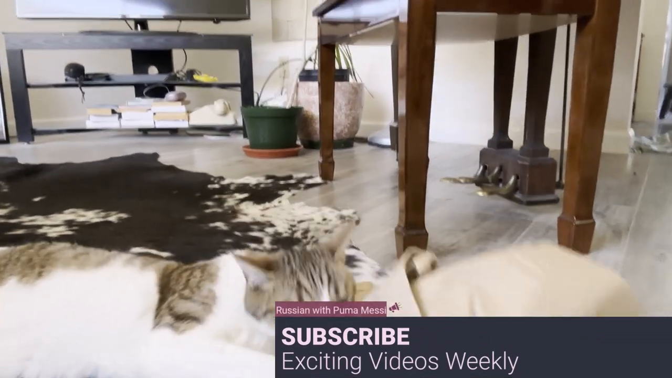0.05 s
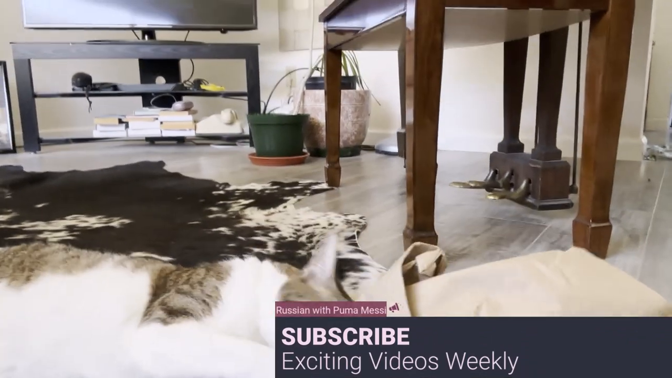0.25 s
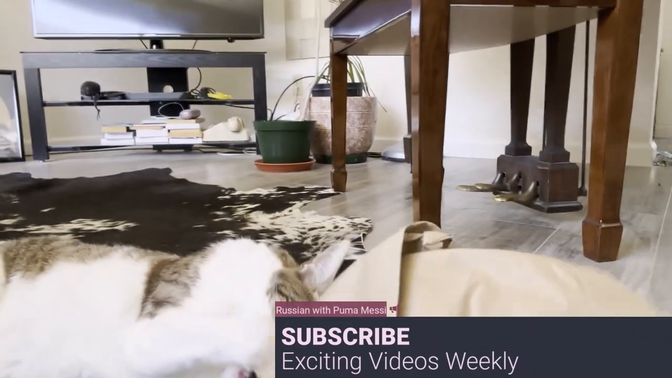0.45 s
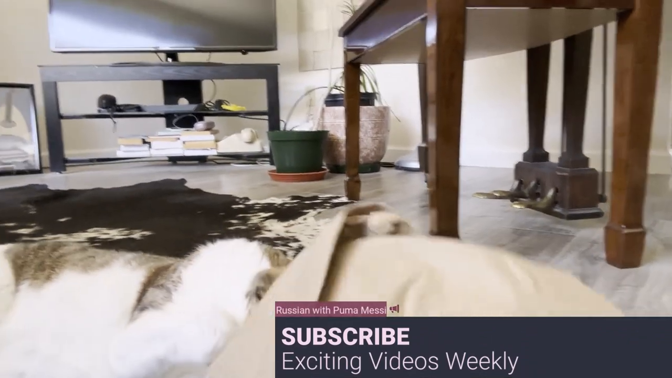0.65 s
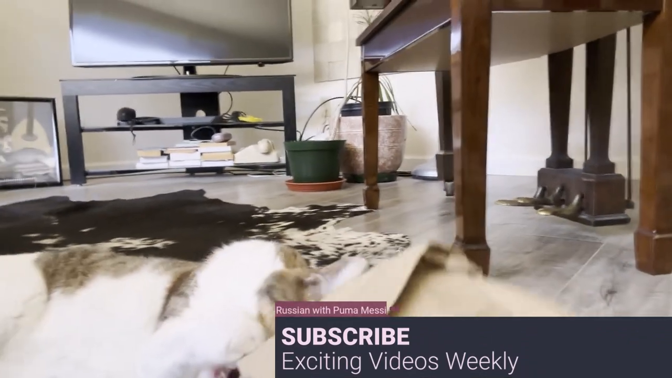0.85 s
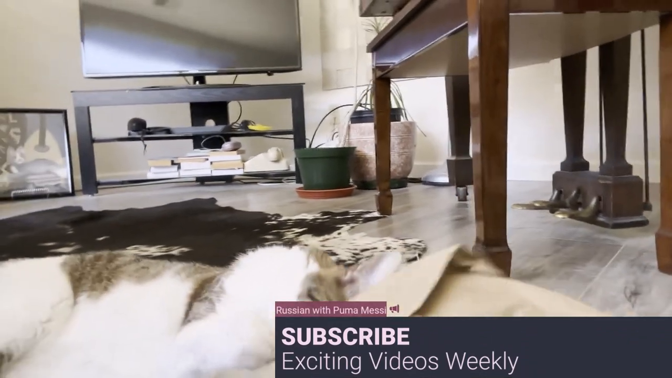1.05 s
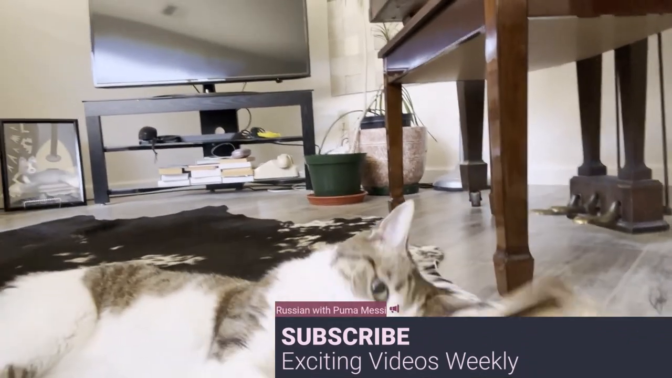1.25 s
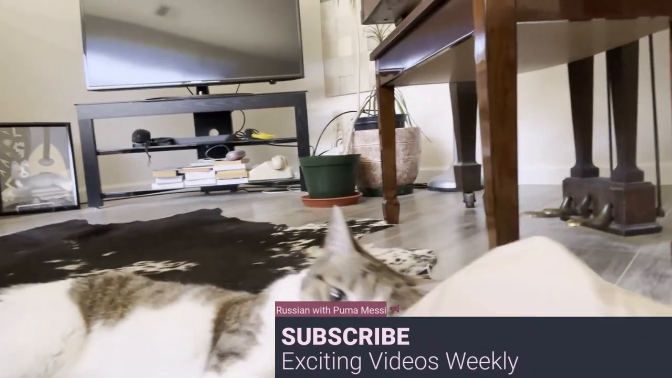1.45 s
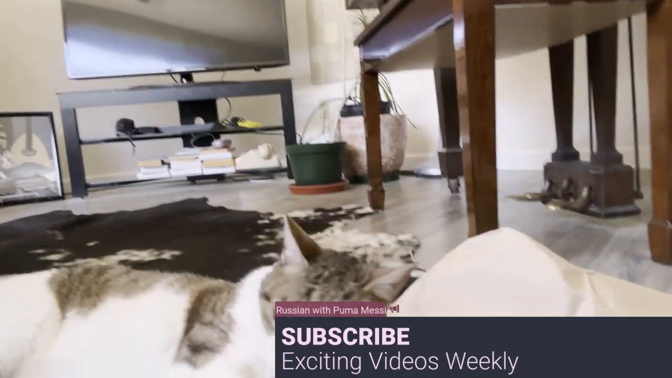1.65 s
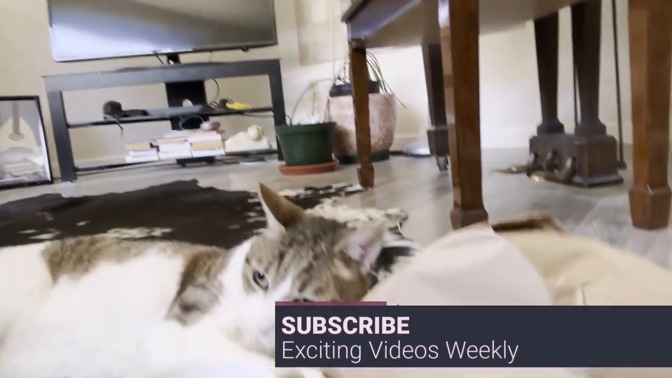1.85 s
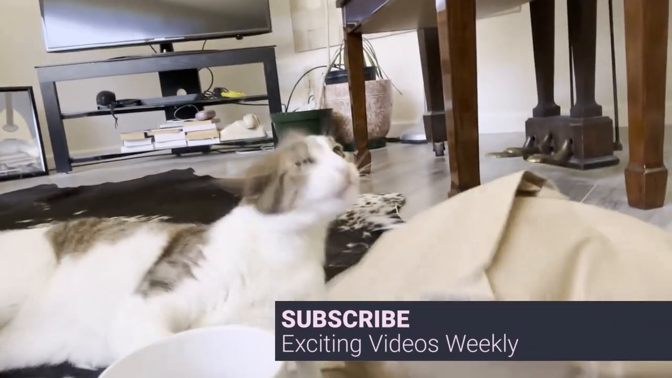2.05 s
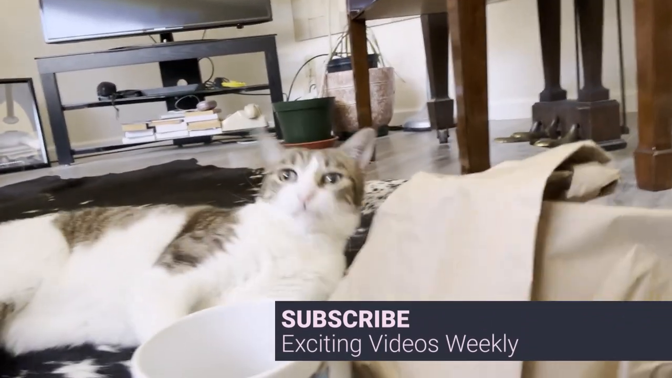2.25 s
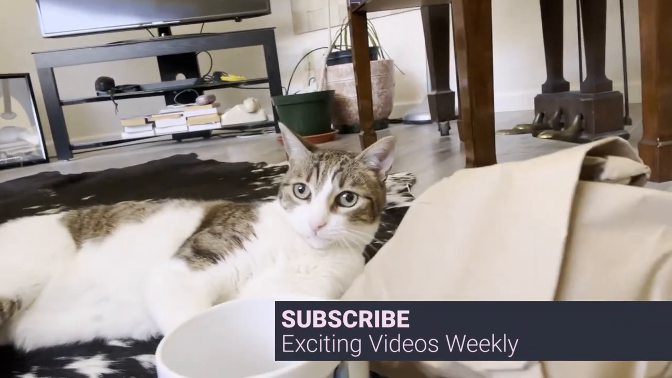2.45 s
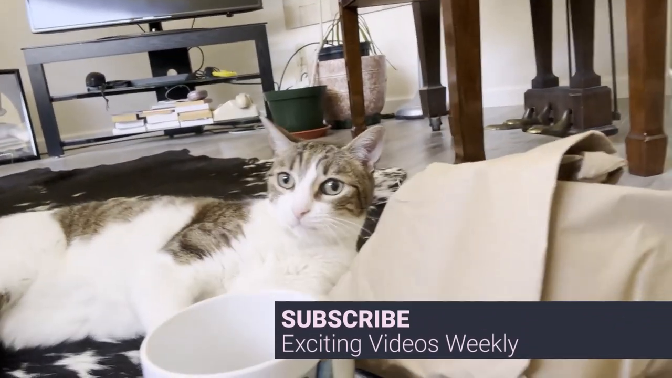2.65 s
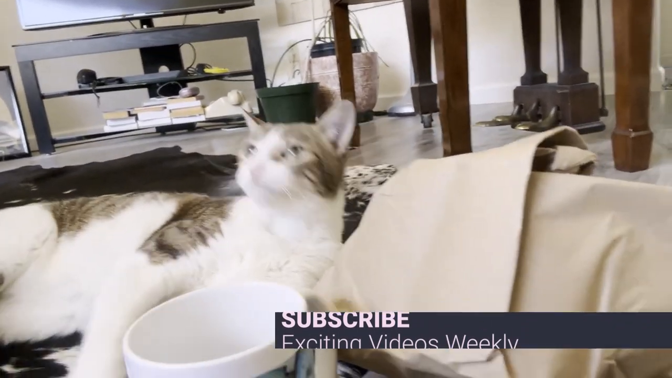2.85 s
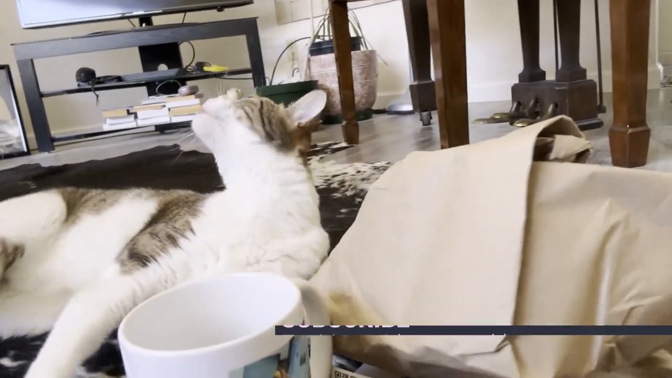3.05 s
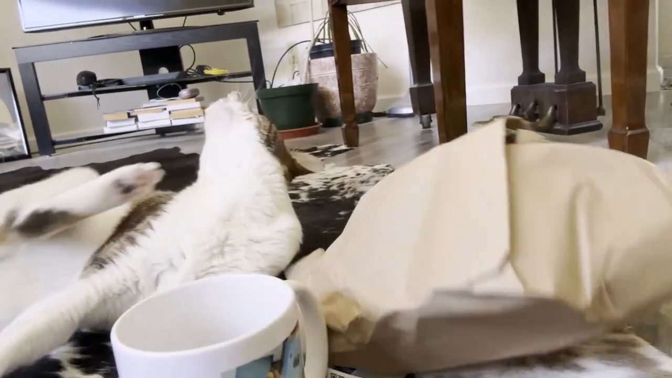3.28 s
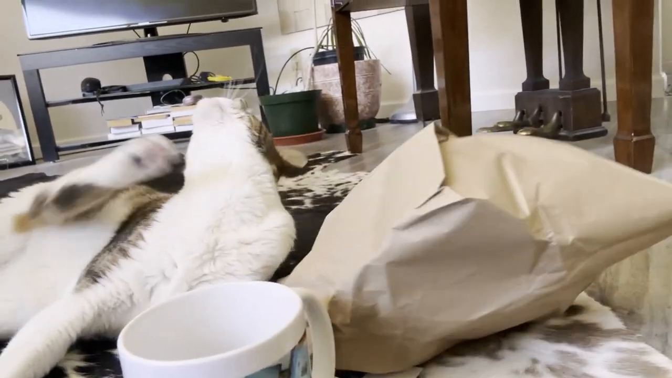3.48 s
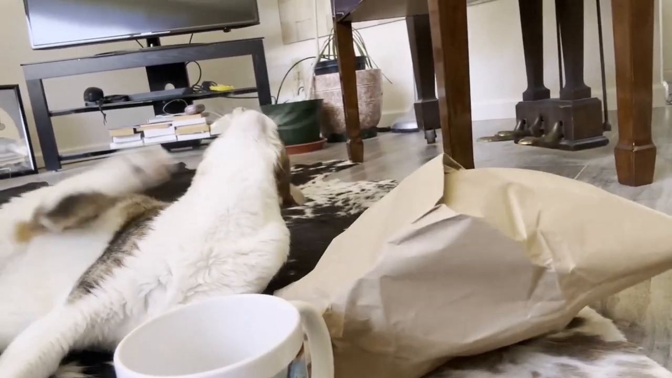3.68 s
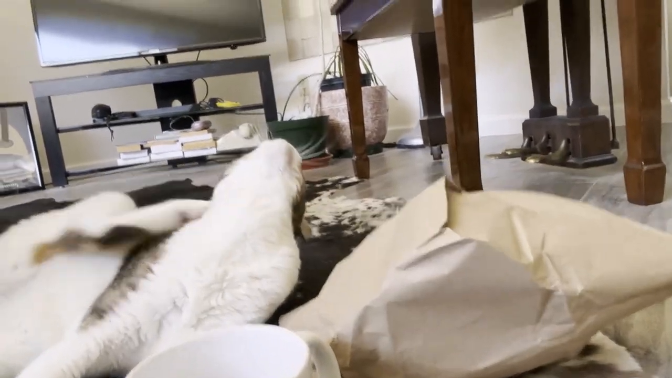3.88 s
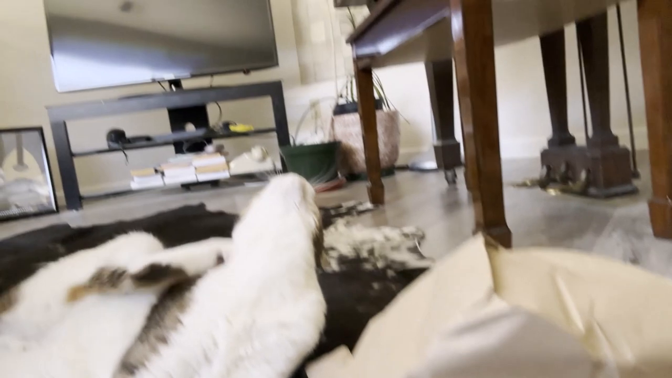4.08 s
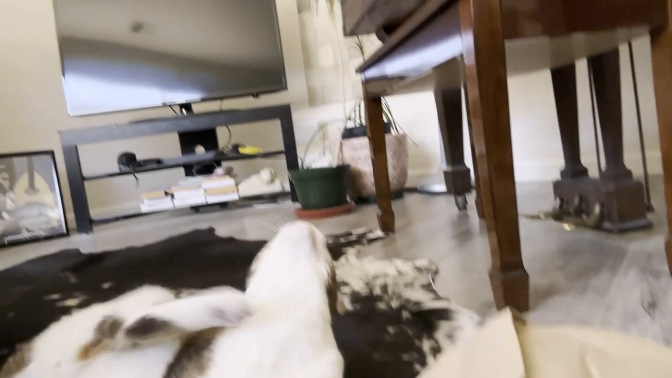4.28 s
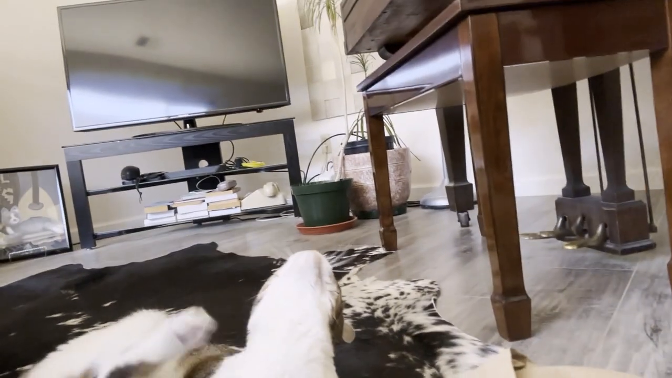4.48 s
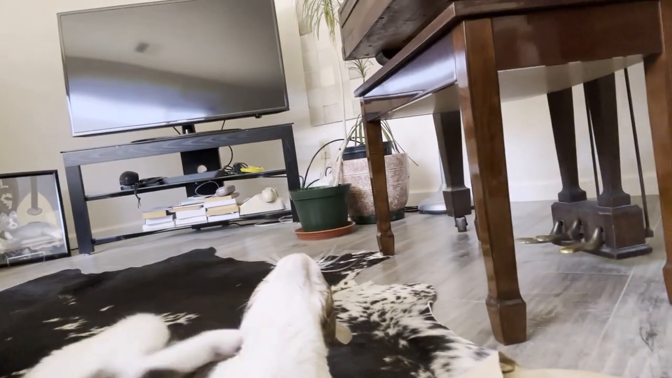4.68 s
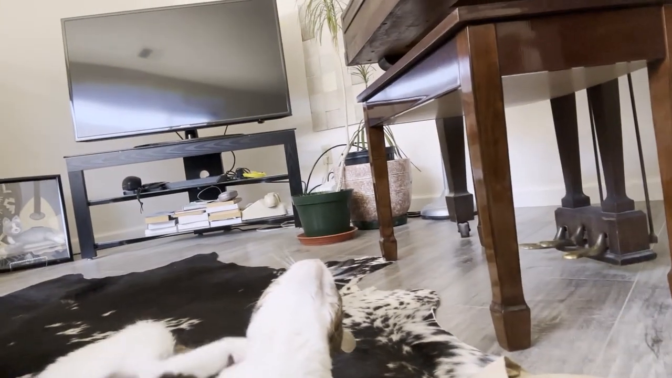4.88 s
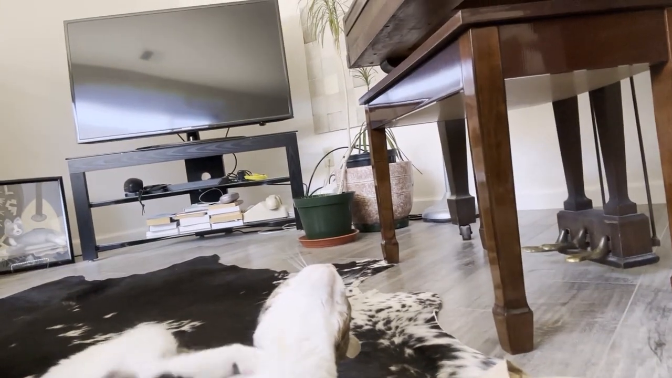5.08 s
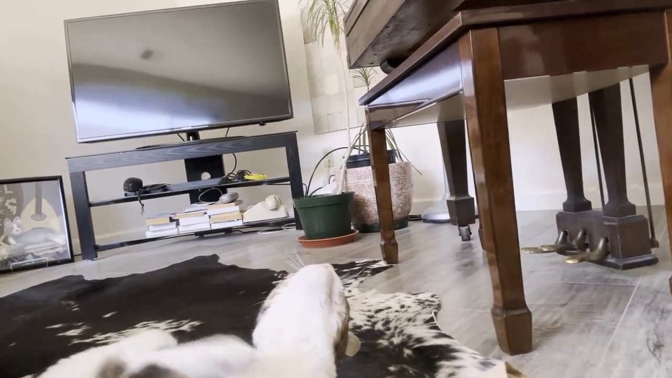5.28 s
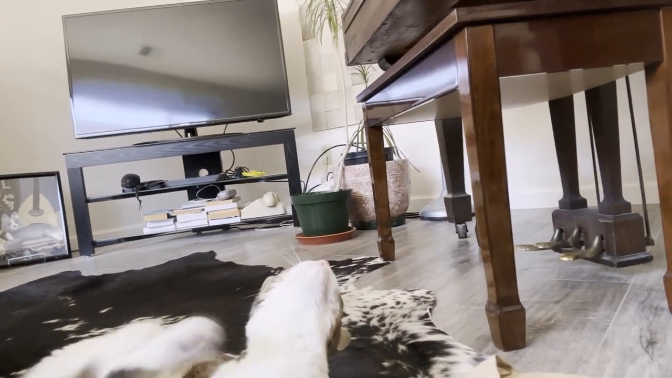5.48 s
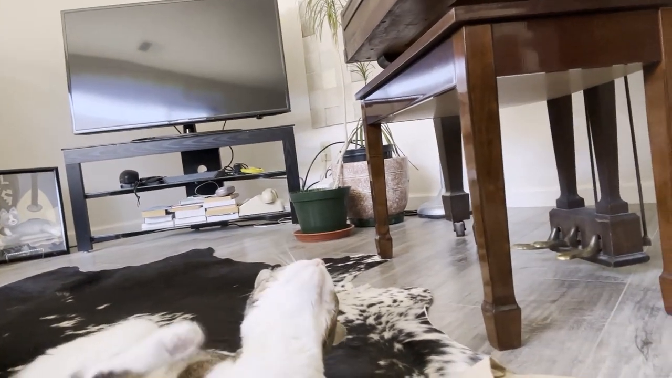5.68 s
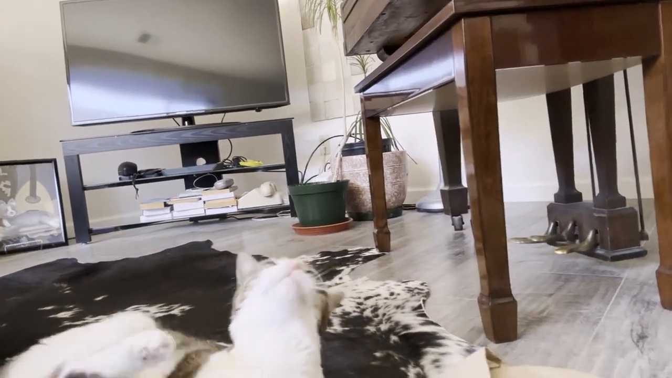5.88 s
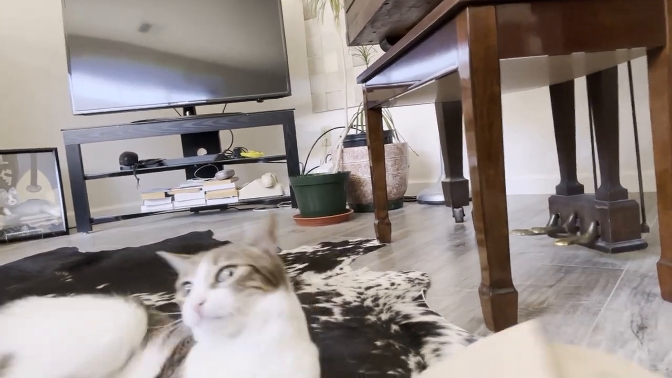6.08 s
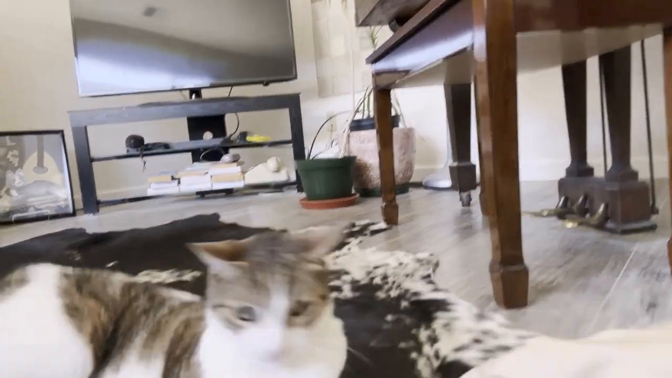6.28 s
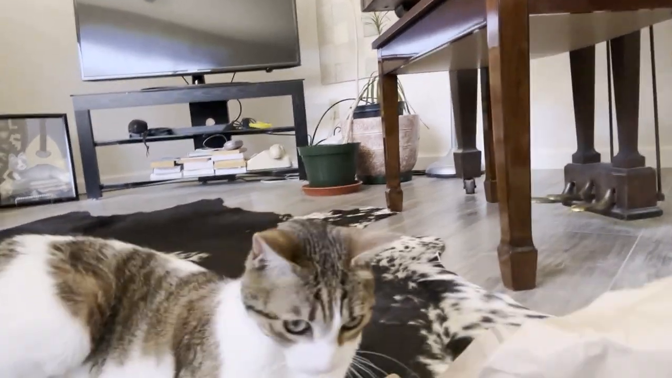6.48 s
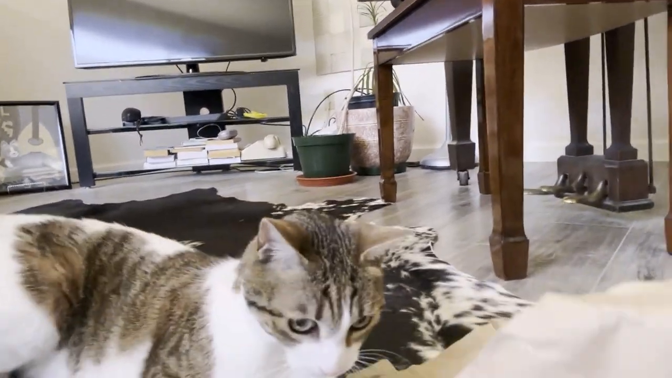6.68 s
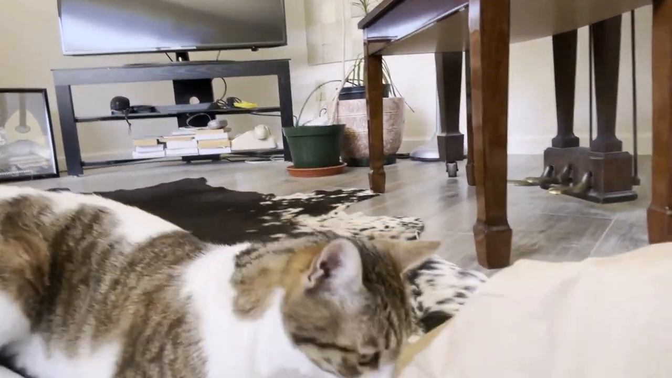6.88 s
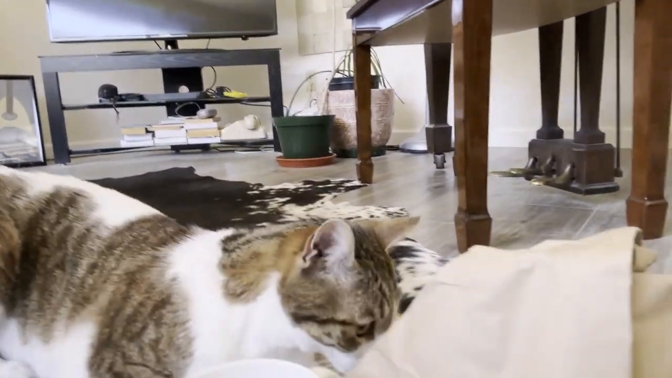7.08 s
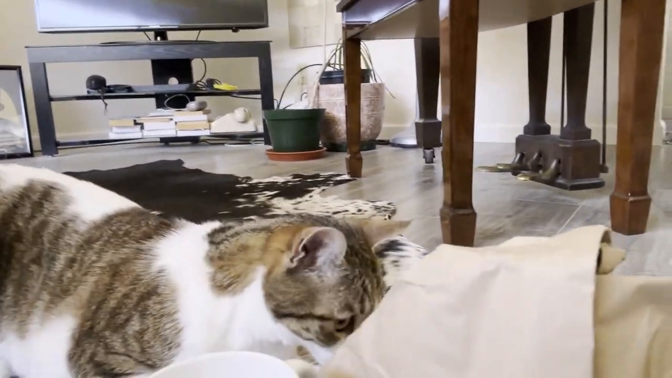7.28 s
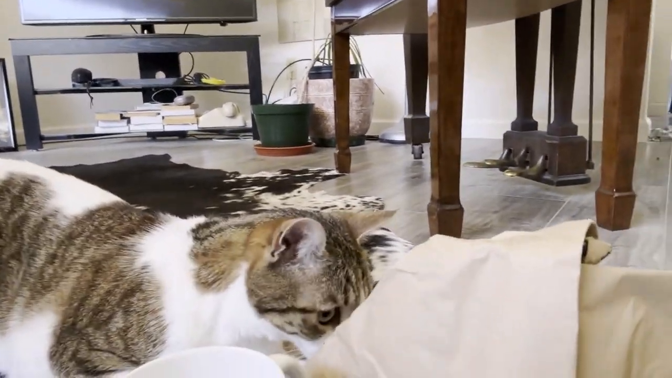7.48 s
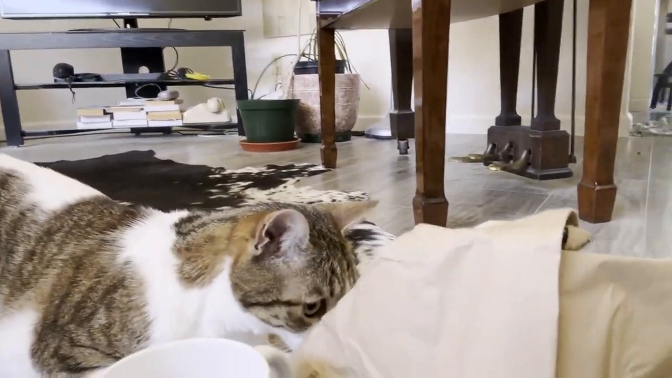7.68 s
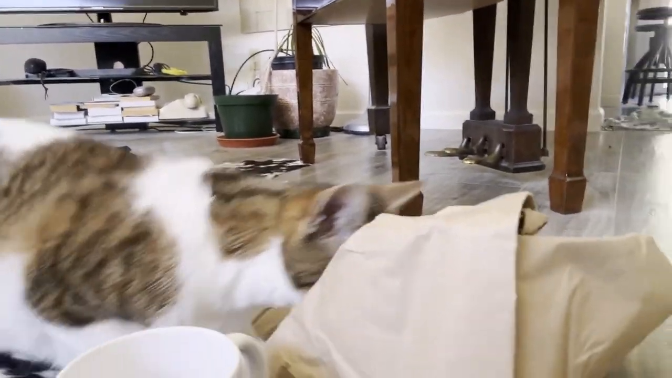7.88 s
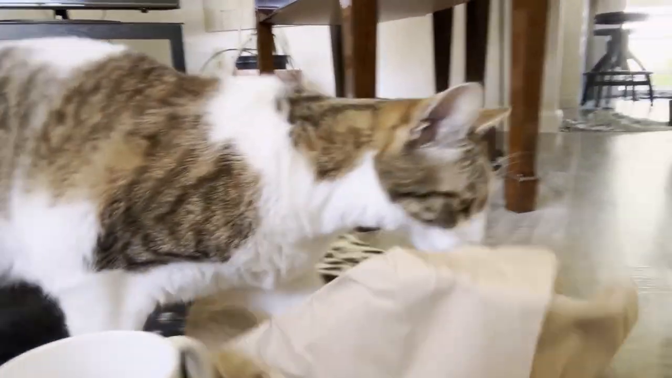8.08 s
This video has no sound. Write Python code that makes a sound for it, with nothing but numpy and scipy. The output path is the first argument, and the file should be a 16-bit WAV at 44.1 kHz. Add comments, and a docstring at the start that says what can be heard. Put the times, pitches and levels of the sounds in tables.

```python
"""On a living-room floor, a cat rolls on and pushes into brown packing paper, close to a hand-held phone.
Creases snap as short bursts, ripples and falling knocks, over a rustle of noise mixed with tiny buckles.
Low noise makes the sheet heave; an edge scrapes, soft brushing strokes fade, and a china mug rings once.
A furnished room answers with a fading tail of noise; left and right differ, but hardly in the top treble."""
import sys
import numpy as np
from scipy import signal
from scipy.fft import rfft, irfft, next_fast_len
from scipy.io import wavfile
from scipy.ndimage import uniform_filter1d, map_coordinates

SR = 44100
rng = np.random.default_rng(int(sys.argv[2]) if len(sys.argv) > 2 else 0)


def to_wav(s):
    """Save 16-bit WAV."""
    ch = np.atleast_2d(s).T  # columns
    pcm = np.round(np.clip(ch, -1, 1) * 32767)  # PCM
    wavfile.write(sys.argv[1], SR, pcm.astype(np.int16))


N = 358577  # length in samples


def amp(db):
    """Turn decibels into a plain multiplier."""
    return 10 ** (np.asarray(db) / 20)


def unit(x):
    """Scale a signal to an average strength (rms) of 1."""
    return x / np.sqrt(np.mean(x ** 2) + 1e-20)


def peak_one(x):
    """Scale a signal so that its highest peak is 1."""
    return x / np.abs(x).max()


def along(points, hz):
    """Read a curve of (f/Hz, value) points, spaced by pitch as the ear does."""
    f, value = np.transpose(points)
    return np.interp(np.log(hz + 1), np.log(f + 1), value)


def filtered(x, response):
    """Change the strength and timing of each frequency in x by a complex response."""
    size = next_fast_len(N + SR // 4)
    hz = np.fft.rfftfreq(size, 1 / SR)
    return irfft(rfft(x, size) * response(hz), size)[..., :N]


def wobble(rate):
    """A smooth random curve through a set number of random points per second."""
    knots = rng.standard_normal(int(N * rate / SR) + 4)
    return map_coordinates(knots, [np.arange(N) * rate / SR])


# Shared part of left and right; the top treble is the same in both: f/Hz, shared part [0 to 1]
SHARED_PART = [(50, 0.88), (300, 0.79), (1500, 0.5), (5000, 0.45), (10000, 0.76), (13000, 1)]


def paired(pair, spectrum):
    """Colour two unrelated signals and mix them into a left and right that share a set part."""
    def turn(hz):
        return np.arccos(np.clip(along(SHARED_PART, hz), 0, 1)) / 2

    def response(hz):
        return amp(along(spectrum, hz)) * [np.cos(turn(hz)), np.sin(turn(hz))]

    mid, side = filtered(pair, response)
    return np.array([mid + side, mid - side])


def rush(spectrum):
    """Coloured stereo noise with an rms of 1."""
    return unit(paired(rng.standard_normal((2, N)), spectrum))


# Colour of the quiet room air: f/Hz, relative level/dB per Hz
AIR_COLOUR = [(20, -25), (35, -3), (85, -2), (160, -17), (400, -18.5), (1200, -36.5), (4000, -37.5),
              (9000, -52), (13000, -40.5), (16000, -45.5)]
AIR_DB = -65.5


def air():
    """The quiet air of the room is a steady, mostly low noise."""
    return amp(AIR_DB) * rush(AIR_COLOUR)


# How long the room rings: f/Hz, time to fall by 60 dB [s]
ROOM_DECAY = [(150, 0.62), (1500, 0.53), (6000, 0.53), (15000, 0.45)]


def room(x):
    """The room's answer is a tail of noise in which each frequency dies at its own speed."""
    hz, t, z = signal.stft(rng.standard_normal((2, SR // 2)), SR, nperseg=256)
    fade = amp(-60 * t / along(ROOM_DECAY, hz)[:, None])
    tail = signal.istft(z * fade, SR, nperseg=256)[1]
    tail = tail / np.linalg.norm(tail[0])
    late = np.pad(x.mean(axis=0), (180, 0))  # the answer starts 180 samples late
    wet = signal.fftconvolve(late[None], tail, axes=1)
    return paired(wet[:, :N], [(100, -3), (15000, -2.0)])


# Taps on the mug: t/s, level/dB before a fixed trim
MUG_TAPS = [(6.3268, -16.5)]
# The ringing tones of the china: f/Hz, level/dB, time to fall by 60 dB [s]
CHINA_TONES = [(2261, -20, .3), (2449, -18, .52), (4800, -24, .06), (5938, -4, .18), (7300, -24, .08),
               (8877, -10, .13), (9039, -13, .14), (10210, -14, .16), (12020, -19, .12), (14630, -9, .13),
               (14860, -1, .06)]


def mug():
    """A light tap, a short bright noise, sets the china ringing in fading pure tones."""
    out = np.zeros(N + SR)
    t = np.arange(SR // 2) / SR
    for s, db in MUG_TAPS:
        ring = np.zeros(len(t))
        for hz, level, t60 in CHINA_TONES:
            ring += amp(level - 60 * t / t60) * np.sin(2 * np.pi * (hz * t + rng.random()))
        tap = 0.37 * amp(-60 * t / 0.049) * np.diff(rng.standard_normal(len(t) + 1))
        out[round(s * SR):][:len(t)] += amp(db - 9) * (ring + tap)
    return out[:N] * np.ones((2, 1))


# Colour of a brushing stroke: f/Hz, relative level/dB per Hz
BRUSH_COLOUR = [(150, 1), (400, 9.5), (1500, -3), (4000, 0.5), (8000, -11), (13000, -6), (16000, -8.5)]
STROKE_COUNT = 14
FIRST_STROKE_S, STROKE_GAP_S, GAP_GROWS_S = 3.755, .152, .0018
# the first stroke, the loss with each further one, the random scatter
STROKE_DB, STROKE_FADE_DB, STROKE_SCATTER_DB = -64.5, .75, 1.5


def strokes():
    """Soft brushing on the sheet slows and fades: each stroke is a flickering swell of noise, 1/8 s long."""
    t = np.arange(N) / SR
    swell = np.zeros(N)
    for k in range(STROKE_COUNT):
        middle = FIRST_STROKE_S + STROKE_GAP_S * k + GAP_GROWS_S * k * k / 2
        db = STROKE_DB - STROKE_FADE_DB * k + STROKE_SCATTER_DB * rng.standard_normal()
        swell += amp(db) * np.cos(np.pi * np.clip((t - middle) * 8, -.5, .5))
    return swell * amp(4.2 * wobble(56)) * rush(BRUSH_COLOUR)


# Loudness of a hollow scrape: t/s, level/dB
SCRAPE_LEVEL = [(2.841, -99), (2.92, -67.5), (3.04, -73), (3.09, -59), (3.2, -53.5), (3.3, -99)]


def scrape():
    """An edge drags over the floor and a fold of the paper colours the noise it makes."""
    s, db = np.transpose(SCRAPE_LEVEL)
    level = amp(np.interp(np.arange(N) / SR, s, db))
    return level * rush([(900, -26.5), (1150, 1.0), (1450, -2.5), (1800, -30.5)])


# Pushes of the cat: t/s at full strength, hold [s], rustle level/dB, hiss level/dB, heave level/dB
CAT_PUSHES = [(0.047, 0.013, -38, -38.5, -32), (0.149, 0.096, -50, -47, -50),
              (0.293, 0.026, -43.5, -37.5, -46), (0.373, 0.031, -32, -34.5, -36),
              (0.449, 0.068, -43.5, -43.5, -39), (0.555, 0.053, -32.5, -37.5, -37.5),
              (0.655, 0.051, -32.5, -39.5, -34.5), (0.796, 0.041, -37.5, -43, -44),
              (0.93, 0.018, -39.5, -44.5, -41), (1.007, 0.025, -27.5, -34.5, -33.5),
              (1.125, 0.013, -22.5, -31.5, -23.5), (1.212, 0.011, -29, -32, -34),
              (1.271, 0.022, -28, -34, -32), (1.378, .02, -23.5, -32, -26.5),
              (1.495, 0.018, -34.5, -38.5, -42), (1.592, 0.12, -44, -51, -52),
              (1.792, 0.012, -41.5, -48, -45.5), (1.875, 0.037, -50.5, -55, -58),
              (2.026, 0.014, -47, -50.5, -49), (2.089, 0.0084, -49.5, -66.5, -54),
              (2.164, 0.011, -49.5, -53, -39), (2.227, 0.014, -70, -59.5, -56),
              (2.381, 0.048, -71, -67, -74), (2.457, 0.018, -71, -72, -54),
              (2.626, 0.011, -59.5, -69.5, -59), (2.914, 0.15, -70, -61.5, -69),
              (3.079, 0.012, -50, -50, -55.5), (3.172, 0.3, -52.5, -53.5, -54.5),
              (3.54, 0.057, -56.5, -57.5, -50), (3.738, 0.0082, -61.5, -80, -53.5),
              (4.005, 0.083, -81, -78.5, -63.5), (4.173, 0.054, -67, -78.5, -59),
              (4.307, 0.033, -67.5, -73, -57.5), (4.458, 0.096, -70.5, -69, -69),
              (4.657, .01, -60, -59.5, -56), (5.1, 0.25, -77.5, -82, -73), (5.58, 0.018, -76.5, -88, -62),
              (5.865, 0.075, -72.5, -67.5, -73), (5.999, 0.13, -52.5, -54, -54),
              (6.18, 0.0054, -34.5, -36.5, -32), (6.271, 0.053, -53, -57, -53),
              (6.426, 0.013, -51, -59, -75), (6.55, 0.11, -73, -68, -81),
              (6.67, 0.012, -59.5, -64.5, -59.5), (6.784, 0.022, -61.5, -62.5, -57),
              (7.026, 0.079, -61, -57, -58), (7.699, 0.0052, -55.5, -59, -54),
              (7.847, 0.06, -46.5, -48, -56), (7.92, 0.0083, -65, -52, -45),
              (8.022, 0.091, -44, -47, -41.5)]
# The sheet barely stirring: rustle level/dB, hiss level/dB, heave level/dB
REST_LEVELS = (-79.5, -82, -72)
# slopes close to full strength, for rustle, hiss and heave
RISE_DB_PER_S, FALL_DB_PER_S = (318.5, 300, 260), (240, 219, 200.5)
BEND_S = 0.2  # slopes steepen further away: at this distance the loss has doubled


def motion():
    """Levels in dB of rustle, hiss and heave: pushes swell, hold and die away; overlapping ones add."""
    t = np.arange(0, N / SR, .004)
    power = amp(REST_LEVELS)[:, None] ** 2
    for s, hold_s, *dbs in CAT_PUSHES:
        before = np.maximum(s - t, 0)
        after = np.maximum(t - s - abs(hold_s), 0)
        rise_loss = np.outer(RISE_DB_PER_S, before * (1 + before / BEND_S))
        fall_loss = np.outer(FALL_DB_PER_S, after * (1 + after / BEND_S))
        power = power + amp(np.c_[dbs] - (rise_loss + fall_loss)) ** 2
    return [np.interp(np.arange(N) / SR, t, 10 * np.log10(p)) for p in power]


def grains(per_second, hz, cycles, spread_db):
    """Tiny buckles of the sheet at random times: short fading ripples, few large and many small, rms 1."""
    draw = rng.random((int(per_second * N / SR), 4))
    t = np.arange(200) / SR
    pitch = hz * np.exp(1.24 * (draw[:, 1:2] - .5))
    size = amp(-spread_db * np.log(draw[:, 2:3] + 0.0045)) * np.sqrt(pitch)
    fade = np.exp(-t * pitch / cycles)
    ripple = size * fade * np.sin(2 * np.pi * (pitch * t + draw[:, 3:]))
    at = (draw[:, :1] * N).astype(int) + np.arange(len(t))
    return unit(np.bincount(at.ravel(), ripple.ravel(), minlength=N)[:N])


def crackling(spectrum, crackle, share):
    """Smooth sliding noise gives way to crackle by a share of its power."""
    share = np.clip(share, 0, 1)
    two_crackles = np.array([crackle, np.roll(crackle, N // 2)])  # shifted in time to be unrelated
    grit = unit(paired(two_crackles, spectrum))
    return np.sqrt(1 - share) * rush(spectrum) + np.sqrt(share) * grit


# Colours of the middle rustle, the fine hiss and the low heave: f/Hz, relative level/dB per Hz
RUSTLE_COLOUR = [(120, -30.5), (250, 1.5), (500, -3), (1000, -3), (2000, -7.5), (3500, -18.5),
                 (8000, -46.5)]
HISS_COLOUR = [(1200, -27.5), (2500, -1.5), (4000, -1), (6000, 0), (8000, -7), (10500, -5), (13000, -1),
               (16000, -10)]
HEAVE_COLOUR = [(20, -33.5), (45, -10), (80, 1.5), (130, 0.5), (220, -9.5), (500, -45.5)]


def rustle():
    """Fur and paper slide and buckle: a middle rustle, a fine hiss and the low heave of the whole sheet."""
    rustle_db, hiss_db, heave_db = motion()
    # gentle moves mostly slide, strong ones buckle the sheet
    force = np.clip((rustle_db + 63.5) / 28, 0, 1)
    clumps = force * wobble(70)  # buckles come in clumps that both layers share
    body_grains = grains(300, hz=761, cycles=3.0, spread_db=4.0)
    fine_grains = grains(500, hz=4480, cycles=2.3, spread_db=2.5)
    body = crackling(RUSTLE_COLOUR, body_grains, share=0.3 + 0.35 * force)
    fine = crackling(HISS_COLOUR, fine_grains, share=0.32 + 0.29 * force)
    body = amp(rustle_db + 2 * clumps + 2 * wobble(25)) * body
    fine = amp(hiss_db + 3 * clumps + 1.5 * wobble(25)) * fine
    heave = amp(heave_db + 1.8 * wobble(14)) * rush(HEAVE_COLOUR)
    return body + fine + heave


LESSER_PER_S = 28
# middle of their level above the rustle, full range around it, and the level none exceeds
LESSER_DB, LESSER_SPREAD_DB, LESSER_TOP_DB = 8, 9.5, -22.5


def lesser():
    """Smaller creases, in rows like the clear snaps, fall at random times; they follow the rustle's level."""
    draw = rng.random((int(LESSER_PER_S * N / SR), 6))
    rustle_db = motion()[0][(draw[:, 0] * N).astype(int)]
    db = rustle_db + LESSER_DB + LESSER_SPREAD_DB * (draw[:, 1] - .5)
    db = np.minimum(db, LESSER_TOP_DB)
    facet_hz = 1700 * 3.5 ** draw[:, 2] ** 2
    edge_db = -16 + 16 * draw[:, 3]
    panel_hz = 400 * 3.2 ** draw[:, 4]
    knock_db = -8 + 11 * draw[:, 5]
    return [*np.c_[draw[:, 0] * N / SR, db, facet_hz, edge_db, panel_hz, knock_db]]


# The clearest snapping creases: t/s, level/dB, facet f/Hz, edge level/dB relative to the second column,
# panel f/Hz that the knock glides around, knock level/dB relative to the second column
CLEAR_SNAPS = [(0.0112, -27, 1690, -13, 1130, -5), (0.0455, -15.5, 1740, -1, 375, -8),
               (0.0647, -23, 5300, -6.5, 1270, -5.5), (0.18, -29.5, 6930, 2, 860, -7),
               (0.2596, -14.5, 3570, -5.5, 396, -27.5), (0.3017, -20.5, 1580, 3.5, 1210, -10),
               (0.3484, -19, 2520, -16.5, 1250, -14), (0.3651, -22.5, 3290, -13.5, 570, -12),
               (0.374, -16.5, 7340, -1.5, 412, 2.5), (0.3793, -11.5, 6300, -7, 1050, -4),
               (0.393, -16, 3490, -11.5, 560, -25), (0.4298, -17, 2360, -12, 1350, -7),
               (0.4666, -17, 3930, -27, 1210, -15), (0.5474, -28, 1900, -9.5, 1060, 6.5),
               (0.5671, -13, 4090, -2.5, 715, -4.5), (0.58, -24, 2700, -11, 684, -15),
               (0.6736, -16, 3620, -8.5, 630, -1), (0.6943, -20.5, 2130, -7.5, 375, -7),
               (0.7799, -14, 3250, -6.5, 617, -5), (0.8237, -22, 3630, -12.5, 960, -5),
               (0.8514, -23.5, 3700, -3.5, 780, -7.5), (0.9033, -21.5, 5900, -11, 700, -8.5),
               (0.9701, -23.5, 2500, -12, 740, 4), (0.98, -12, 3160, -7.5, 716, -8.5),
               (0.9938, -18, 2410, -8.5, 1130, -4), (1.021, -17.5, 7550, -6.5, 576, -10),
               (1.0876, -23.5, 2480, -10.5, 670, 9.5), (1.1128, -25, 2020, 7, 564, 1),
               (1.1246, -20.5, 2250, 7, 550, 6), (1.1177, -18, 2080, 0, 338, 1),
               (1.131, -14.5, 2470, 6, 582, -1), (1.1642, -16.5, 3568, -3, 705, -3),
               (1.2067, -15.5, 6220, -5.5, 724, -12), (1.268, -16.5, 1910, -3.5, 1430, -7),
               (1.301, -20.5, 3830, -2.5, 1430, -8), (1.3387, -15, 1740, -16, 580, -11),
               (1.3756, -7.5, 3130, -4.5, 566, -6.5), (1.38, -9.5, 7800, 0, 710, -10),
               (1.471, -21.5, 7300, -2, 660, -17), (1.4991, -23.5, 3760, -9, 670, -5),
               (1.5131, -19.5, 6200, -5, 720, -4), (1.5569, -27, 2560, -14, 444, -2),
               (1.6379, -28.5, 3470, -15.5, 890, -9), (1.7761, -21.5, 2020, -1, 1003, 3),
               (1.779, -8.5, 3080, -7, 744, -15), (1.8972, -18.5, 6000, -9.5, 1200, -4),
               (2.0646, -29.5, 1830, -1.5, 816, -9), (2.0954, -36.5, 1930, -18, 684, 5.5),
               (2.143, -37, 2580, -8, 593, 8), (2.1623, -37.5, 2630, -14, 643, 2.5),
               (2.2072, -48.5, 5230, 9.5, 562, -1.5), (2.3252, -62, 4420, 13.5, 320, -9.5),
               (2.436, -56, 6070, 9.5, 370, 10), (2.6161, -37, 3270, -25, 975, 2),
               (3.063, -25, 2656, -4, 1263, -0.5), (3.1665, -31.5, 2020, -16, 1150, -16),
               (3.4458, -42, 7190, 2, 580, -16), (4.0757, -55.5, 1673, 3, 950, -4.5),
               (4.232, -45, 4630, -9.5, 264, -5), (4.4597, -58.5, 1970, -3.5, 281, 7.5),
               (4.2967, -58.5, 1990, -9.5, 321, 11), (4.6443, -33, 4450, 9, 1027, -33),
               (5.8371, -47.5, 2543, -1.5, 454, -9.5), (5.9757, -56.5, 1990, -9, 516, 18.5),
               (6.0023, -46.5, 2050, -19, 1084, 11.5), (6.0421, -48, 2000, -7.5, 820, 13.5),
               (6.1607, -27.5, 3230, -6, 950, -15), (6.1807, -25, 2050, 4, 500, 2),
               (6.2553, -33.5, 4740, -13.5, 650, -12), (6.2775, -26, 4930, -21, 1210, -2),
               (6.309, -51, 2000, -10, 680, 16), (6.3803, -31.5, 2650, -22, 1270, -1),
               (6.4226, -38, 1890, 0, 500, -1), (6.444, -44, 2490, -14, 1330, -3),
               (6.5654, -57, 2270, 5, 282, -7), (6.673, -51.5, 2440, -14.5, 760, 8),
               (6.7686, -34, 4160, -11.5, 1340, -14), (6.8064, -42, 1940, -26, 1310, -6.5),
               (7.6929, -54.5, 1982, 3.5, 615, 11.5), (7.8801, -34, 4700, -5, 464, -19),
               (7.9298, -24.5, 7200, -6, 1090, -36), (8.0092, -32, 4480, -5, 313, -11.5),
               (8.024, -17.5, 3670, 5.5, 485, -15), (8.0439, -34, 2560, -15, 487, 5),
               (8.0816, -25.5, 6340, 4.5, 650, -22)]


def snaps():
    """A crease flips: a sharp edge, a crack around the stiff facet's pitch and a knock of the panel."""
    out = np.zeros((2, N + SR))
    t = np.arange(SR // 25) / SR
    edge_band = signal.butter(2, 7000, "high", fs=SR, output="sos")
    for s, db, hz, edge_db, panel_hz, knock_db in CLEAR_SNAPS + lesser():
        body, shared, left, right, sharp, uneven = rng.standard_normal(size=(6, len(t)))
        rise = 1 - np.exp(-t / 0.00025)
        burst = rise * amp(-60 * t / .01)
        facet_band = signal.butter(1, [hz / 1.26, hz * 1.15], "band", fs=SR, output="sos")
        facet = peak_one(signal.sosfilt(facet_band, burst * body))
        # noise with softened treble, mostly different on the left and right
        dull = uniform_filter1d(0.14 * shared + 1.7 * np.array([left, right]), size=3)
        crack = facet + .45 * burst * dull
        edge = peak_one(signal.sosfilt(edge_band, rise * amp(-60 * t / 0.0066) * sharp))
        # bending waves spread out, the short ones first: the knock falls in pitch
        glide = .8 + 0.71 * np.exp(-t / .002) + 1.5 * uneven
        phase = 2 * np.pi * panel_hz * np.cumsum(glide) / SR
        knock_shape = (1 - np.exp(-t / 0.0011)) * amp(-60 * t * panel_hz / 14)
        knock = peak_one(knock_shape * np.sin(phase))
        snap = crack + amp(edge_db) * edge + amp(knock_db) * knock
        out[:, round(s * SR):][:, :len(t)] += amp(db) * snap
    return out[:, :N]


def scene():
    """Paper, mug and quiet air add up, with the room's answer to the paper and the mug."""
    hits = snaps()
    slide = rustle() + strokes() + scrape()
    clink = mug()
    into_room = amp(-12.5) * hits + amp(-14.5) * slide + amp(-19) * clink
    return hits + slide + clink + room(into_room) + air()


# Left-right differences, nearly none in the top treble:
# f/Hz, phase by which the left leads [radians], left minus right level/dB
LEFT_RIGHT = [(50, -.2, -2), (200, -.45, -1), (550, -1.1, -2.8), (1400, -1.3, -3.3), (2800, -1.75, -1.8),
              (5000, -2.5, .4), (7000, -2.5, .7), (10000, -1.7, .5), (13000, -.35, .1)]
# Overall tone of the sound, steeply darkened above 15.8 kHz: f/Hz, level/dB
OVERALL_TONE = [(20, -18), (60, -2), (100, -4), (15700, -0.5), (15900, -24), (16700, -23)]
TOP_HZ = 16800


def record(dry):
    """Left and right differ in phase and level; an overall tone is set and nothing is kept above TOP_HZ."""
    f, lead, level_db = np.transpose(LEFT_RIGHT)
    half = np.array([[.5], [-.5]])  # each side takes half of the difference

    def response(hz):
        phase_shift = np.exp(1j * half * along(np.c_[f, lead], hz))
        balance = amp(half * along(np.c_[f, level_db], hz))
        return phase_shift * balance * amp(along(OVERALL_TONE, hz)) * (hz < TOP_HZ)

    return filtered(dry, response)


dry = scene()
out = record(dry)
to_wav(out)
```